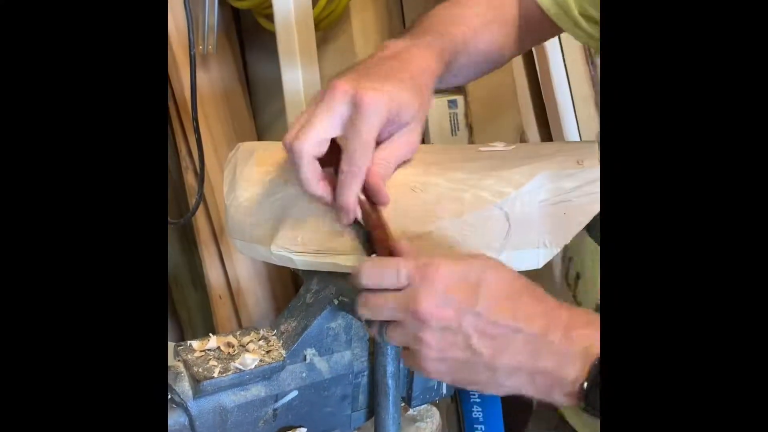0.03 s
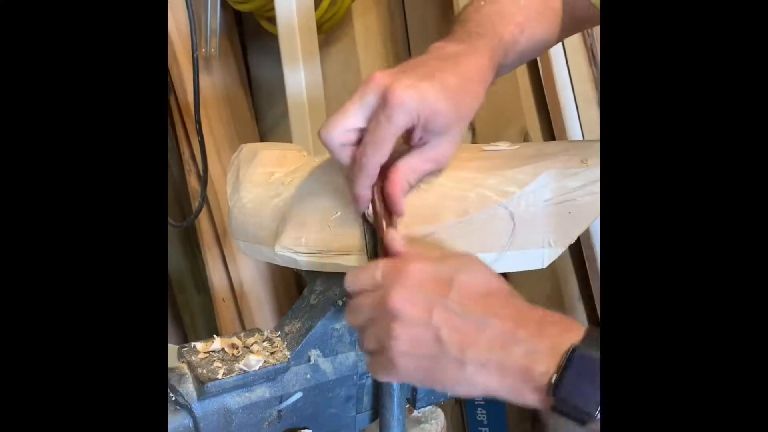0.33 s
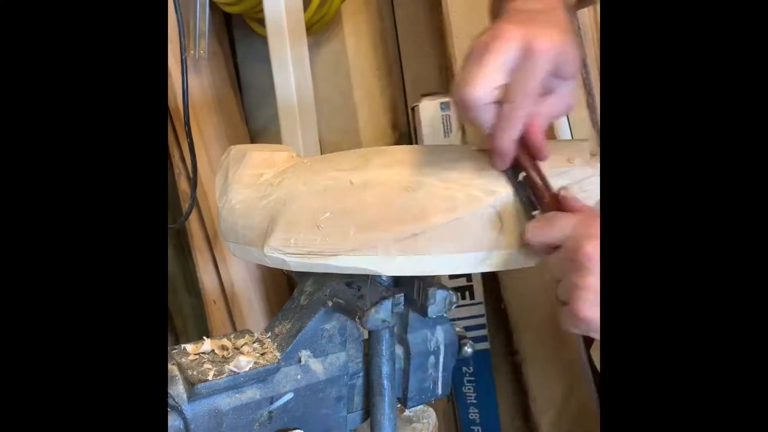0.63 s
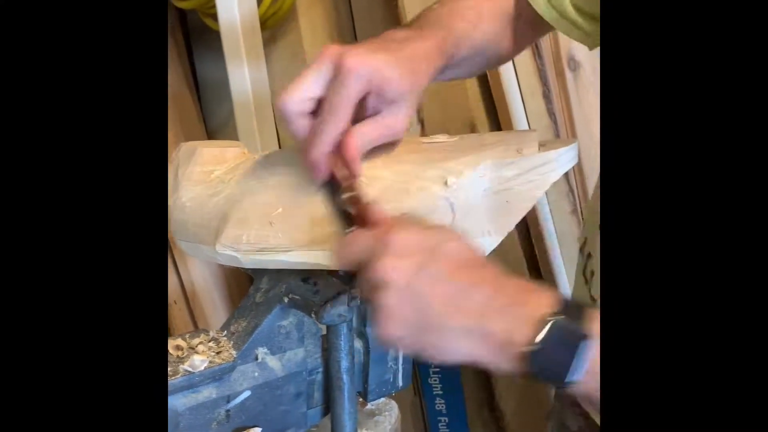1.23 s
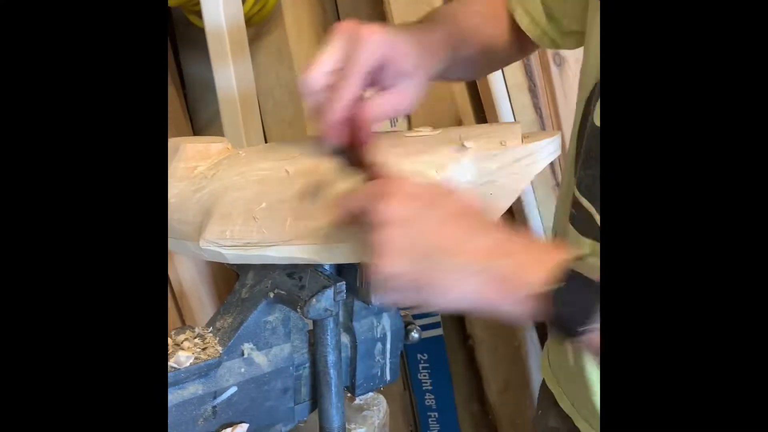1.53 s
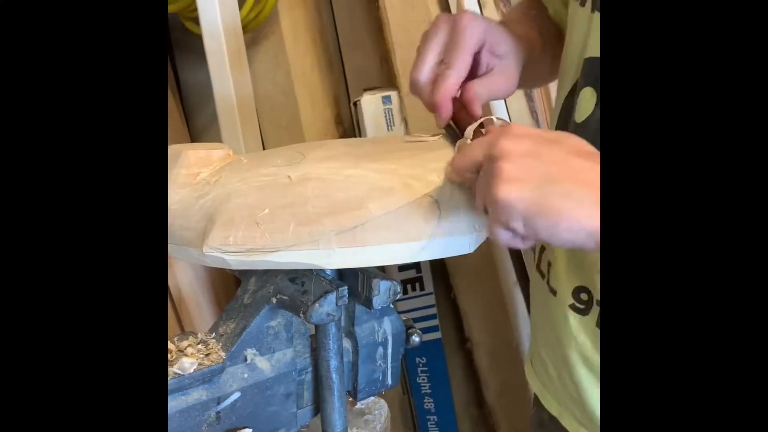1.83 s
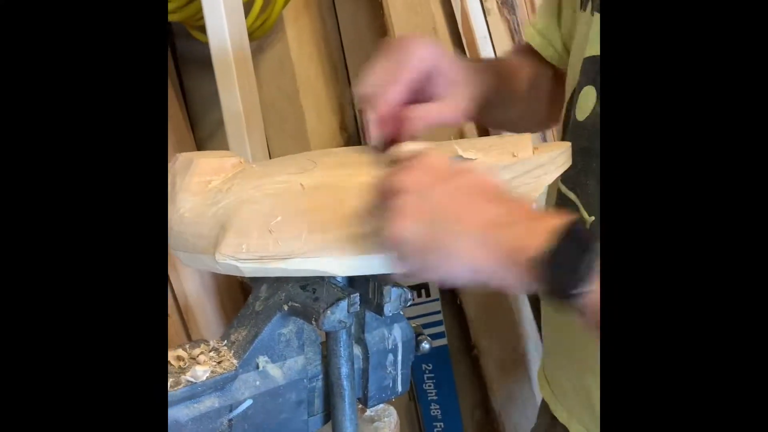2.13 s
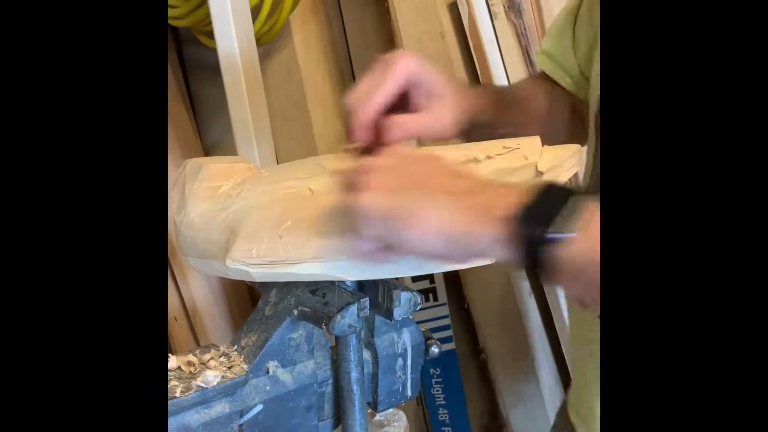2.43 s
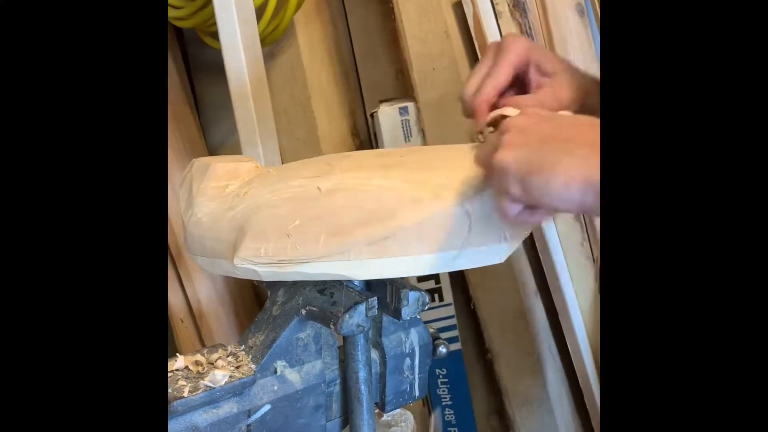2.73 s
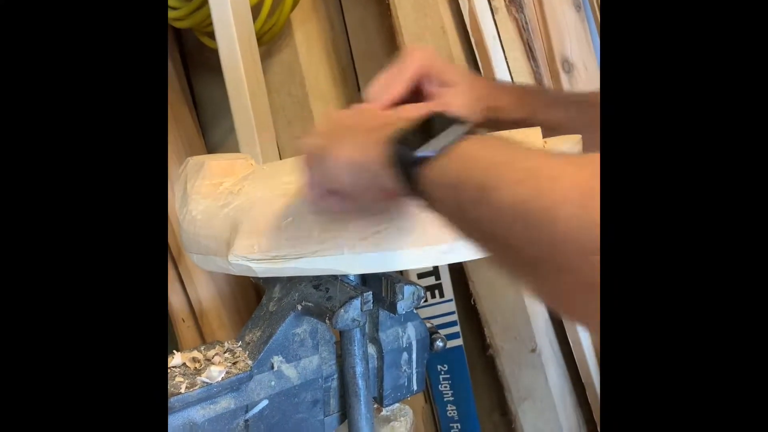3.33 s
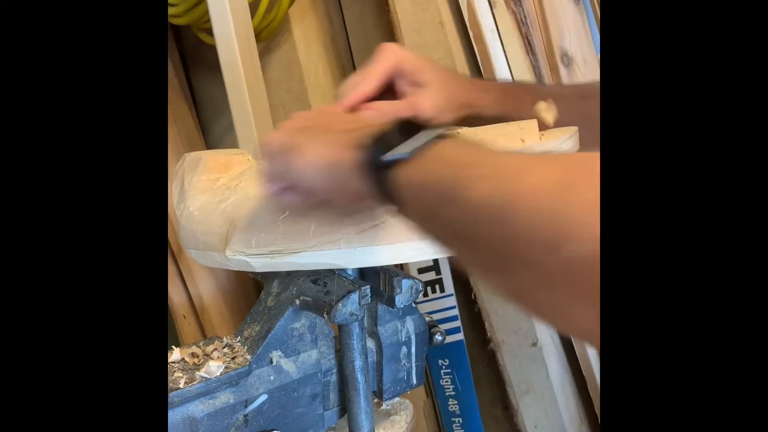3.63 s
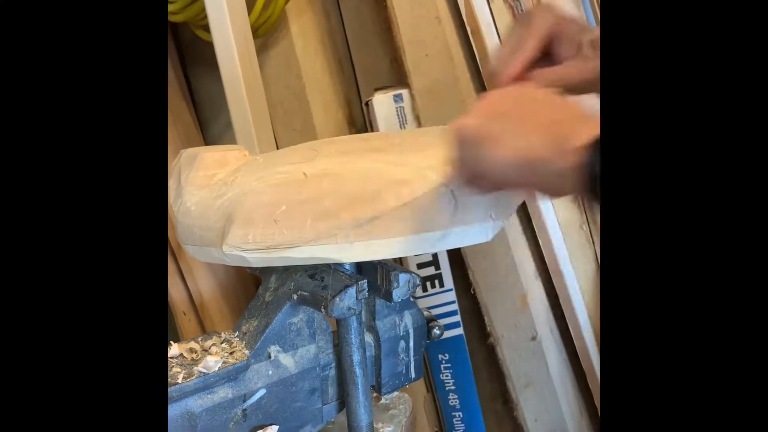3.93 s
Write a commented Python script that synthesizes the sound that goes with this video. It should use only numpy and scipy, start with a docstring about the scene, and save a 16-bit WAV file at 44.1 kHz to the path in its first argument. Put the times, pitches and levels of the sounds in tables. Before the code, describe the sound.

Wood being shaved by hand, with repeated crackling scrapes, light slides and dull knocks.

```python
"""Shaving a wooden block

A two-handled shaving tool is worked along a block in a vise, close by in a small workshop.
Each cut tears fibres in a dense crackle; the blade chatters by stick-slip and the block judders.
Between cuts the tool slides lightly back; now and then it knocks on the wood or a chip snaps."""
import sys
import numpy as np
from scipy import signal
from scipy.fft import rfft, irfft
from scipy.io import wavfile
from scipy.ndimage import uniform_filter1d

SR = 44100
rng = np.random.default_rng(int(sys.argv[2]) if len(sys.argv) > 2 else 0)


def waveform_to_disk(signal):
    """Save audio, clipped to [-1, 1], as 16-bit WAV at the path in sys.argv[1]."""
    frames = np.transpose(np.atleast_2d(signal))
    scaled = np.clip(frames, -1, 1) * 32767
    samples = np.round(scaled).astype(np.int16)
    wavfile.write(sys.argv[1], SR, samples)


N = 176400
T = np.arange(N) / SR

# Return slides. Each row: middle, hold, rise and fall in seconds, hiss and wood ring levels in dB.
SLIDES = [(0.095, 0.021, 0.029, 0.035, -52.5, -66), (0.157, 0.017, 0.022, 0.07, -45, -51.5),
          (0.337, 0.047, 0.034, 0.036, -41.5, -54), (0.756, 0.021, 0.13, 0.049, -37.5, -34),
          (1.144, 0.076, 0.037, 0.02, -40, -40), (1.54, 0.075, 0.11, 0.043, -42.5, -39.5),
          (1.968, 0.074, 0.043, 0.053, -35, -39), (2.435, 0.045, 0.13, 0.071, -37, -43),
          (3.152, 0.054, 0.0052, 0.093, -47, -44), (3.611, 0.056, 0.061, 0.067, -39, -36.5),
          (3.982, 0.032, 0.057, .06, -41, -37.5)]
# Snapping chips. Each row: start in seconds, bright tick level in dB, dull crack level in dB.
SNAPS = [(0.136, -60, -39), (0.1468, -56, -30.5), (.24, -42, -62.5), (0.293, -53, -41), (1.051, -40, -59),
         (1.087, -37, -39), (1.272, -22, -20), (1.285, -19, -28), (1.311, -20, -20), (1.491, -31, -47),
         (1.501, -25, -40), (1.509, -25.5, -42), (1.694, -23.5, -30), (1.747, -16, -22), (1.809, -28, -40),
         (2.152, -23, -34), (2.173, -19, -22), (2.254, -28.5, -25), (2.404, -24, -50), (2.749, -23, -41),
         (2.785, -23, -27), (2.991, -33.5, -39), (3.128, -33.5, -49), (3.47, -24, -29), (3.541, -29, -43)]
# Cuts. Each row: middle, hold, rise and fall in seconds, hiss, rasp, wood ring and hollow ring in dB.
CUTS = [(0.56, 0.049, 0.12, 0.05, -25.5, -28.5, -32.5, -35),
        (0.928, 0.06, 0.078, 0.056, -29, -27.5, -38, -32.5),
        (1.322, 0.079, 0.06, 0.061, -28, -25.5, -32.5, -34),
        (1.744, 0.067, 0.066, 0.064, -27, -23.5, -26, -32),
        (2.18, 0.021, 0.075, 0.095, -25.5, -26, -26, -36.5),
        (2.673, 0.033, 0.1, 0.18, -27.5, -27, -33.5, -37),
        (3.401, 0.062, 0.094, 0.078, -30.5, -35.5, -33.5, -43.5),
        (3.788, 0.069, 0.045, 0.071, -26.5, -30, -30.5, -43)]
# Crunches and judders. Each row: middle, hold, rise and fall in seconds, level in dB.
CRUNCHES = [(0.165, 0.015, .012, 0.053, -45), (0.559, 0.007, 0.01, 0.036, -30.5),
            (.935, 0.035, .02, .025, -43), (1.292, 0.0056, 0.017, .02, -30.5),
            (1.358, 0.02, .006, 0.013, -30), (1.69, 0.0024, .002, .006, -23),
            (1.71, .005, .003, 0.013, -24.5), (1.742, 0.019, 0.005, 0.008, -22),
            (2.166, 0.017, .003, 0.018, -23.5), (2.611, 0.012, 0.005, 0.02, -29.5),
            (2.678, 0.027, .005, 0.029, -30.5), (3.402, 0.022, 0.026, 0.013, -31),
            (3.784, 0.015, 0.014, 0.016, -28)]
JUDDERS = [(0.55, 0.14, .1, 0.27, -38.5), (0.97, 0.087, 0.11, 0.82, -42.5),
           (1.312, 0.093, 0.099, 0.33, -34), (1.757, 0.13, 0.16, 0.4, -37), (2.227, 0.23, 0.036, 0.1, -30),
           (2.768, 0.17, 0.12, 0.1, -24), (3.454, 0.083, 0.13, 0.16, -27), (3.851, 0.037, 0.099, 0.08, -25),
           (3.895, 0.076, 0.052, 0.29, -31.5)]
# Bursts of blade chatter. Each row: middle and length in seconds, slip rate in Hz, level in dB.
CHATTERS = [(0.496, 0.014, 796, -26), (0.582, 0.037, 692, -26), (0.893, 0.027, 873, -27.5),
            (0.985, 0.018, 864, -36), (1.308, 0.01, 930, -18), (1.372, 0.01, 800, -20),
            (1.713, 0.018, 822, -21), (1.744, 0.0087, 886, -21), (1.791, 0.014, 778, -21.5),
            (2.185, 0.018, 715.5, -19.5), (2.232, 0.032, 793, -27.5), (2.362, 0.041, 697, -39.5),
            (2.639, 0.026, 706, -17), (2.688, 0.026, 678, -28), (2.914, 0.0072, 748, -30.5),
            (3.398, 0.018, 632, -20), (3.424, 0.019, 710, -19), (3.622, 0.021, 721, -32),
            (3.786, 0.019, 698, -22), (3.833, 0.016, 646, -19.5)]
# Brief singing of the tool on its way back. Each row: middle and hold in seconds, level in dB.
SINGS = [(0.754, 0.027, -45.5), (1.168, 0.027, -52), (1.571, 0.012, -42), (1.96, 0.045, -49.5),
         (2.43, 0.028, -48), (3.618, 0.037, -46)]
# Bites of the edge. Each row: start in seconds, starting pitch in Hz, level in dB.
BITES = [(1.216, 1140, -31), (1.636, 1280, -24), (1.691, 1306, -16), (2.09, 1310, -32.5),
         (2.159, 1380, -18), (2.551, 1180, -23), (2.567, 1176, -22.5), (2.618, 1055, -11.5)]
# Knocks on the block and jolts in the vise. Each row: start in seconds, level in dB, pitch ratio.
KNOCKS = [(1.092, -27.5, 1.08), (2.785, -18, .8), (2.909, -19, 1), (3.131, -21, 0.87), (3.138, -23.5, .96),
          (3.299, -35, 1.07)]
JOLTS = [(1.284, -14.5, 0.93), (1.807, -15, 1.22), (2.121, -12.5, 1.03), (2.249, -7, 1.01),
         (2.34, -19, 1.25), (2.579, -8, 0.97), (2.727, -6, 1), (2.753, -4.5, 1.1), (2.825, -12, 1.15),
         (3.133, -27, 1.38), (3.453, -10, 1.3), (3.482, -13.5, 0.99), (3.715, -24.5, 0.97),
         (3.81, -5.5, 1.05), (3.824, -4, 1.21), (3.855, -9, 1.22)]

# Spectra of the sources. Each row: frequency in Hz, relative spectral density in dB.
SLIDE_SPECTRUM = [(300, -28), (1400, -10.5), (2200, 6), (3000, -4), (3800, 6), (5000, -5), (7200, 5.5),
                  (9000, 3), (11000, 3), (16000, -3.5)]
TICK_SPECTRUM = [(300, -10), (1200, -15), (3000, 0), (7000, 4), (11000, 6), (16000, 5.5)]
CRACK_SPECTRUM = [(60, -58), (400, -18.5), (1000, 5), (2000, -3), (3500, -3), (7000, -8.5), (10000, -79),
                  (16000, -14)]
CRUNCH_SPECTRUM = [(100, -48), (700, 8.5), (1100, 9), (1700, 3.5), (2200, 6.5), (2800, -1), (3600, -11.5),
                   (4600, -18), (9000, -15.5)]
HISS_SPECTRUM = [(100, -30), (500, 11), (1500, -8), (3300, 9.5), (4500, 3.5), (6000, 5.5), (7400, 9.5),
                 (9000, 3.5), (10800, 12), (13000, 1), (16000, 4.5)]
RASP_SPECTRUM = [(30, -26), (100, 2.5), (200, -31.5), (300, -10.5), (390, -5.5), (465, 2.5), (525, -11.5),
                 (630, 1), (850, 7.5), (1150, 5.5), (1400, -9.5), (1750, -5.5), (2150, -7), (2800, -27),
                 (3600, -4.5), (4600, -26), (9000, -20)]
VISE_SPECTRUM = [(12, -37), (28, 4.5), (55, -27), (72, -10), (89, -1), (108, -7.5), (132, 3), (148, -4.5),
                 (168, -1.5), (205, -12), (250, -12.5), (330, -13.5), (600, -22), (1200, -28.5),
                 (4000, -71)]
SLIP_SPECTRUM = [(20, -49), (150, -46), (450, -6.5), (700, 5.5), (1000, -3), (1400, -22), (2000, -12),
                 (2800, -27.5), (3500, -17.5), (5000, -49), (15000, -61)]
RUMBLE_SPECTRUM = [(10, -43), (25, -4), (45, -1.5), (95, -3.5), (200, -21), (700, -30), (2000, -40),
                   (6000, -42.5), (16000, -63.5)]

# Normal modes. Each row: frequency in Hz, time to decay 60 dB in seconds, relative level in dB.
TOOL_MODES = [(2128, 0.022, 1.5), (2290, 0.027, -0.5), (3070, 0.035, -14), (3655, 0.071, -4),
              (6130, 0.022, 3.5), (6620, 0.017, 2), (7080, 0.0088, 2.5), (8000, 0.044, -7.5)]
BLOCK_MODES = [(251.6, .13, -12.5), (462, 0.021, 5), (656, 0.029, -6.5), (690.7, 0.1, 6), (803, 0.048, 0),
               (1085, 0.072, -10), (1500, 0.021, -16), (1960, 0.05, -21), (2164, 0.019, -36)]
HOLLOW_MODES = [(312, 0.042, -7.5), (372, 0.067, -5), (465.5, 0.13, 2.5), (570, 0.051, -3.5)]  # low modes of the block under a deep cut
SING_MODES = [(2021, 0.045, -2), (2475, 0.039, -1), (7020, 0.031, 4.5), (7260, 0.011, 4.5)]
JOLT_MODES = [(136.4, 0.15, 6.5), (169, 0.13, 1.5), (247, .06, -16)]

# Brightness of the work. Each row: time in seconds, gain of the top treble in dB.
TREBLE_GAIN = [(.5, -8.5), (1.3, 1.5), (1.75, 1), (2.6, -3), (3.4, -4.5), (3.9, -5)]
# Reverberation. Each row: frequency in Hz, level against the direct sound in dB.
ROOM_SPECTRUM = [(40, -51), (150, -26), (350, -8), (800, -9.5), (1400, -10.5), (2600, -7.5), (5000, -43),
                 (15000, -85)]
# Lag between the microphone ports. Each row: frequency in Hz, left minus right phase in radians.
PORT_PHASE = [(0, 0), (1200, -.3), (2800, .6), (4850, 3.14), (22050, 28.6)]
# Balance of the ports. Each row: frequency in Hz, left minus right level in dB.
PORT_BALANCE = [(50, -.4), (130, .7), (300, 1), (700, .3), (1200, -.3), (4000, -.1)]
# Balance as the tool moves. Each row: time in seconds, left minus right level in dB.
TOOL_BALANCE = [(0, 0), (1.75, -0.1), (3.3, 0.4), (4, 0.1)]


def undb(db):
    """Amplitude grows tenfold for every 20 dB."""
    return 10 ** (np.asarray(db) / 20)


def unit(x):
    """Normalisation to an rms of 1."""
    return x / np.sqrt(np.mean(x ** 2))


def butter(order, hz, kind):
    """A maximally flat filter, as second-order sections."""
    return signal.butter(order, hz, kind, fs=SR, output="sos")


def gains(points, size):
    """Gains at the Fourier bins, interpolated in dB over log frequency."""
    hz, db = np.array(points).T
    return undb(np.interp(np.log(np.fft.rfftfreq(size, 1 / SR) + 1e-9), np.log(hz), db))


def through(x, response):
    """Convolution with an impulse response scaled to unit energy."""
    return signal.fftconvolve(x, response / np.linalg.norm(response))[:N]


def colour(x, spectrum, size=8192):
    """Minimum-phase filtering: folding the cepstrum makes the response causal."""
    cepstrum = irfft(np.log(gains(spectrum, size)))
    cepstrum[size // 2:] = 0
    cepstrum[0] = 0
    return through(x, irfft(np.exp(rfft(2 * cepstrum))))


def drift(per_s):
    """Twice-averaged noise fluctuates smoothly, with an rms of 1."""
    width = max(int(SR / per_s), 2)
    return unit(uniform_filter1d(uniform_filter1d(rng.standard_normal(N), width), width))


def swell(middle, hold, rise, fall, power=1.23):
    """A flat-topped envelope, 20 dB down one rise time before and one fall time after its hold."""
    away = np.maximum((middle - hold / 2 - T) / rise, 0) + np.maximum((T - middle - hold / 2) / fall, 0)
    return undb(-20 * np.minimum(away ** power, 10))


def crackle(per_s, scatter_db):
    """Shot noise: independent clicks of log-normal size, with an rms of 1."""
    chance, size, sign = rng.random(N), rng.standard_normal(N), rng.choice([-1, 1], N)
    return unit((chance < per_s / SR) * sign * undb(scatter_db * np.clip(size, -3, 3)))


def blows(events):
    """Ideal impulses, each with its level given as the rms over one millisecond."""
    out = np.zeros(N)
    for start, db in events:
        out[int(start * SR)] += undb(db) * np.sqrt(SR / 1000)
    return out


def resonate(x, modes):
    """Modal superposition: a driven body responds as a sum of damped sinusoids."""
    t = T[:SR // 4]
    return through(x, sum(undb(db - 60 * t / t60) * np.sin(2 * np.pi * hz * t) for hz, t60, db in modes))


def strikes(events, modes):
    """Impulse responses of a body whose pitch depends on where it is pressed."""
    return sum(resonate(blows([(start, db)]), [(hz * ratio, t60, level) for hz, t60, level in modes])
               for start, db, ratio in events)


def block(x, wander=.014, per_s=17.5):
    """Resonance of the wooden block, whose modes waver under the shifting grip."""
    shift_s = np.cumsum(wander * np.gradient(drift(per_s))) / (2 * per_s)
    return np.interp(T + shift_s, T, resonate(x, BLOCK_MODES))


def slides(catch_db=2.5):
    """Sliding friction: the sole rubs back over the wood, hissing and ringing tool and block."""
    grain = crackle(per_s=9000, scatter_db=2) * unit(undb(catch_db * drift(per_s=50)))
    forces = np.array([swell(*row[:4]) for row in SLIDES])
    hiss, wood_drive = undb(np.array(SLIDES)[:, 4:].T) @ forces * grain
    return colour(hiss, SLIDE_SPECTRUM) + undb(-9.5) * resonate(hiss, TOOL_MODES) + block(wood_drive)


def snaps(splinter_db=-2.5, splinter_t60_s=0.051):
    """Brittle fracture: a chip breaks off with a bright tick, splinters and a duller crack."""
    t = T[:SR // 10]
    splinters = crackle(per_s=2500, scatter_db=2.5)[:len(t)] * undb(-60 * t / splinter_t60_s)
    ticks = blows([(start, db) for start, db, _ in SNAPS])
    cracks = blows([(start, db) for start, _, db in SNAPS])
    bright = ticks + undb(splinter_db) * through(ticks, splinters)
    return colour(bright, TICK_SPECTRUM) + colour(cracks, CRACK_SPECTRUM)


def crunches():
    """Fragmentation: the edge digs in and a thicker shaving breaks up in a coarse burst."""
    force = sum(undb(db) * swell(*timing) for *timing, db in CRUNCHES)
    return colour(force * crackle(per_s=2500, scatter_db=2), CRUNCH_SPECTRUM)


def tears(release_s=0.0049, bed_db=4.5):
    """Relaxation: bunches of fibres give way at once and die out, over a steady bed."""
    breaks = np.abs(crackle(per_s=140, scatter_db=3))
    releases = signal.lfilter([1], [1, -np.exp(-1 / (release_s * SR))], breaks)
    return unit(unit(releases) + undb(bed_db))


def cuts(catch_db=0.7, ring_lag_s=0.023, glide_per_s=.7, pitch_wander=0.01987):
    """Fibre fracture radiates a fine hiss, and a rasp and wood ring that sink in pitch along each cut."""
    catch = unit(undb(catch_db * drift(per_s=38)) * tears())
    fine = unit(crackle(per_s=9000, scatter_db=3) * catch)
    coarse = crackle(per_s=2200, scatter_db=3.5) * catch
    rasp = colour(unit(coarse + .5 * fine), RASP_SPECTRUM)
    ring = block(crackle(per_s=2200, scatter_db=3.5))
    hollow = resonate(fine, HOLLOW_MODES)
    wander_s = np.cumsum(pitch_wander * drift(per_s=46)) / SR
    hiss_force, wood = 0, 0
    for middle, hold, rise, fall, hiss_db, rasp_db, ring_db, hollow_db in CUTS:
        force = swell(middle, hold, rise, fall)
        late_force = swell(middle + ring_lag_s, hold, rise, fall)
        # Reading the sound ever more slowly lowers its pitch.
        shift_s = np.cumsum(np.clip(glide_per_s * (middle - T), -.2, .2)) / SR + wander_s
        warped = T + shift_s - shift_s[int(middle * SR)]
        hiss_force += undb(hiss_db) * force
        wood += force * np.interp(warped, T, undb(rasp_db) * rasp + undb(hollow_db) * hollow)
        wood += undb(ring_db) * late_force * np.interp(warped, T, ring)
    return colour(hiss_force * fine, HISS_SPECTRUM) + wood


def judder():
    """Forced vibration: the pull of the blade shakes block and vise."""
    force = sum(undb(db) * swell(*timing, power=0.7) for *timing, db in JUDDERS)
    return colour(force * crackle(per_s=900, scatter_db=3.4), VISE_SPECTRUM)


def chatter(slips=160, period_jitter=0.11, scatter_db=3, sag_per_s=4):
    """Stick-slip: the blade catches and lets go unevenly in short bursts, slowing as it digs in."""
    out = np.zeros(N)
    for middle, length, hz, db in CHATTERS:
        jitter, size = rng.standard_normal((2, slips))
        t = np.cumsum(1 + period_jitter * jitter) / hz
        t -= t[slips // 2]
        t += sag_per_s * t ** 2 / 2
        push = undb(db) * np.sqrt(SR / hz) * unit(undb(scatter_db * size)) / np.cosh(2 * t / length)
        np.add.at(out, np.clip((middle + t) * SR, 0, N - 1).astype(int), push)
    return colour(out, SLIP_SPECTRUM)


def sings(rise_s=0.03, fall_s=0.023):
    """Frictional excitation: the sole grips for a moment and rings the tool."""
    force = sum(undb(db) * swell(middle, hold, rise_s, fall_s) for middle, hold, db in SINGS)
    return resonate(force * crackle(per_s=3000, scatter_db=6.2), SING_MODES)


def knocks():
    """Impact: the tool lands on the block, which rings freely."""
    return strikes(KNOCKS, BLOCK_MODES)


def bites(t60_s=0.071, sag=0.38, sag_s=0.0027, grit_gain=0.13):
    """Loading: the blade springs as it lands, and its gritty ring drops in pitch as the wood loads it."""
    out = np.zeros(N)
    t = T[:SR // 8]
    for start, hz, db in BITES:
        pitch = hz * (1 - sag * (1 - np.exp(-t / sag_s)))
        grit = unit(signal.sosfilt(butter(1, [600, 2500], "band"), rng.standard_normal(len(t))))
        ring = np.sin(2 * np.pi * np.cumsum(pitch) / SR) + grit_gain * grit
        onset = int(start * SR)
        out[onset:onset + len(t)] += undb(db - 60 * t / t60_s) * ring
    return out


def jolts(band_hz=(83, 304)):
    """Cushioned impact: the block shifts in the vise, whose jaws soften each jolt to a thud."""
    return signal.sosfilt(butter(2, band_hz, "band"), strikes(JOLTS, JOLT_MODES))


def top_treble(x, from_hz=8300):
    """A time-varying shelf filter makes the top of the scraping brightest in the middle strokes."""
    top = signal.sosfiltfilt(butter(3, from_hz, "high"), x)
    gain = undb(np.interp(T, *np.array(TREBLE_GAIN).T))
    return x + (gain - 1) * top


def bench(x, count=8, level_db=-4.5, from_hz=970, spread_s=.007, drift_s=.00002):
    """Comb filtering: close reflections off hands, tool and bench shift as the hands move."""
    bright = signal.sosfilt(butter(2, from_hz, "high"), x)
    delays = spread_s * (0.10015 + rng.random(count))
    echoes = sum(np.interp(T - delay - drift_s * drift(per_s=6.4), T, bright) for delay in delays)
    return x + undb(level_db) * echoes / np.sqrt(count)


def workshop(x, t60_s=0.41, treble_t60_s=0.32, split_hz=3000, gap_s=.004):
    """Direct sound reaches two microphone ports with a lag; a short diffuse reverberation follows."""
    spectrum = rfft(x, 2 * N)
    phase = np.interp(np.fft.rfftfreq(2 * N, 1 / SR), *np.array(PORT_PHASE).T)
    port = np.exp(.5j * phase) * np.sqrt(gains(PORT_BALANCE, 2 * N))
    direct = irfft(spectrum * np.array([port, 1 / port]))[:, :N]
    room_drive = irfft(spectrum * gains(ROOM_SPECTRUM, 2 * N))[:N]
    t = T[:SR // 2]
    tails = []
    for noise in rng.standard_normal((2, len(t))):
        low = signal.sosfilt(butter(2, split_hz, "low"), noise) * undb(-60 * t / t60_s)
        high = signal.sosfilt(butter(2, split_hz, "high"), noise) * undb(-60 * t / treble_t60_s)
        tails.append(through(room_drive, (low - high) * (t > gap_s)))
    return direct + np.array(tails)


def scene(rumble_db=-47, master_db=-0.99):
    """Superposition: cuts, slides and small contacts add in the room over a quiet low rumble."""
    work = cuts() + slides() + chatter() + judder() + jolts()
    work += bites() + crunches() + knocks() + sings() + snaps()
    near = bench(top_treble(work))
    rumble = undb(rumble_db) * colour(rng.standard_normal(N), RUMBLE_SPECTRUM)
    pan_db = np.interp(T, *np.array(TOOL_BALANCE).T)
    return undb(master_db + np.array([pan_db, -pan_db]) / 2) * workshop(near + rumble)


def record(dry):
    """Band limiting: a steep low-pass filter removes the treble above 15.8 kHz."""
    return signal.sosfilt(signal.ellip(10, .2, 80, 15800, fs=SR, output="sos"), dry)


dry = scene()
out = record(dry)
waveform_to_disk(out)
```